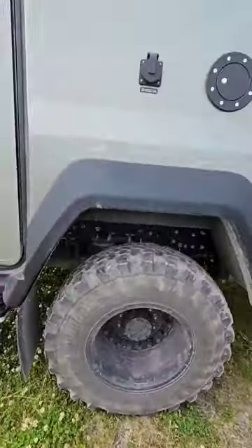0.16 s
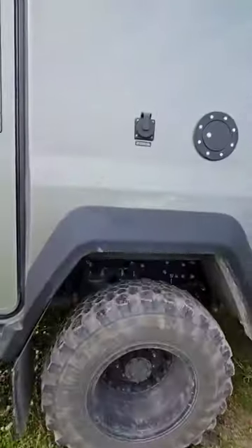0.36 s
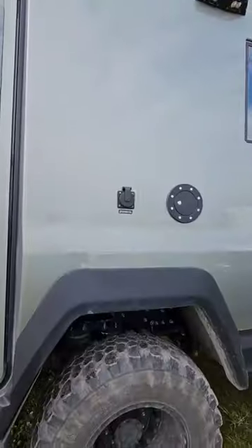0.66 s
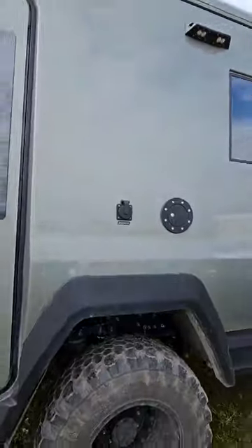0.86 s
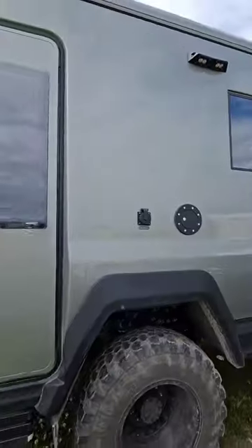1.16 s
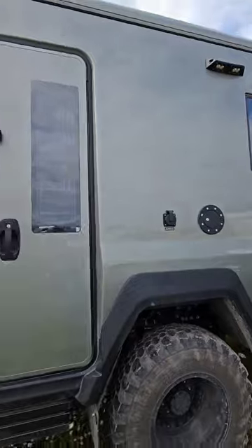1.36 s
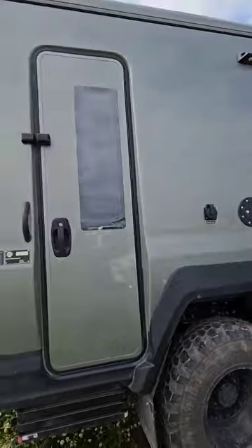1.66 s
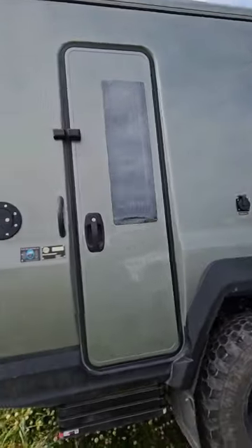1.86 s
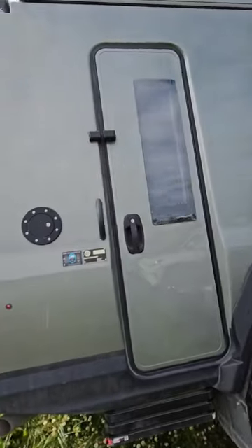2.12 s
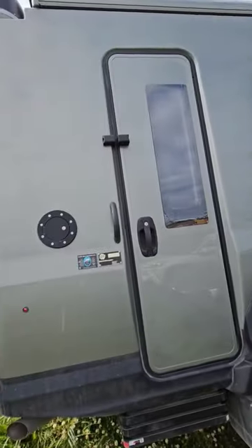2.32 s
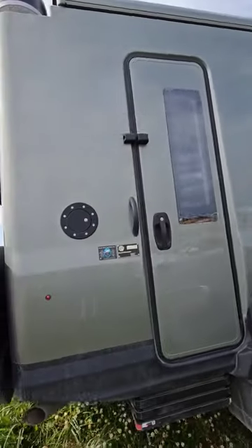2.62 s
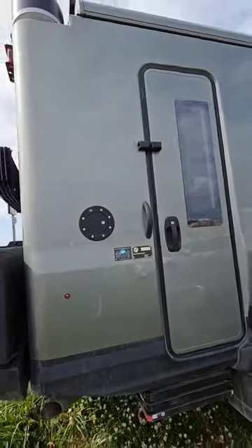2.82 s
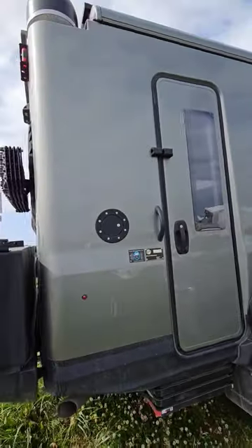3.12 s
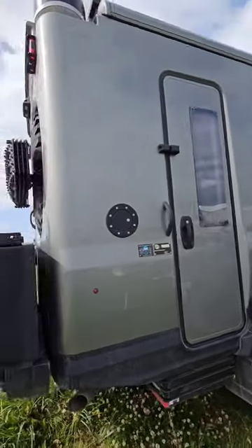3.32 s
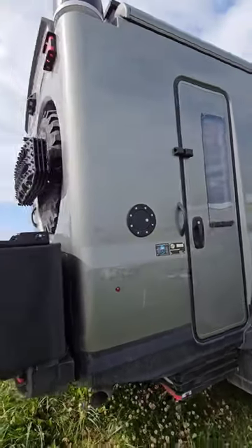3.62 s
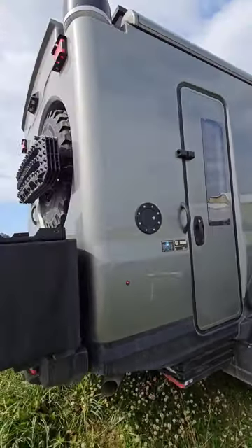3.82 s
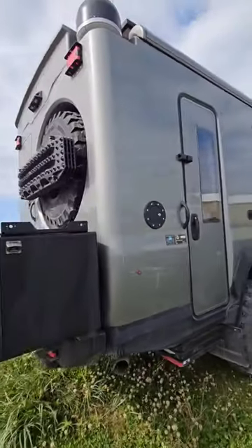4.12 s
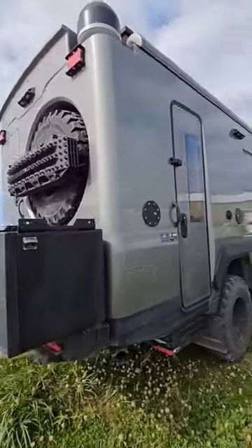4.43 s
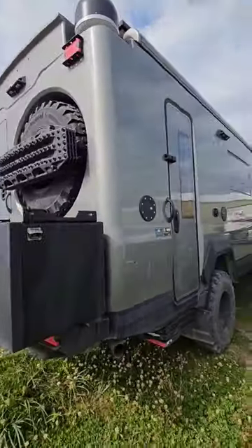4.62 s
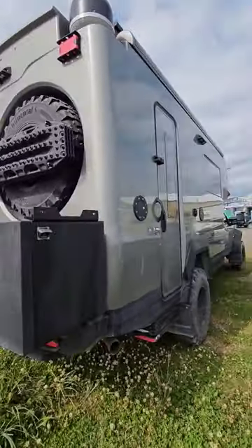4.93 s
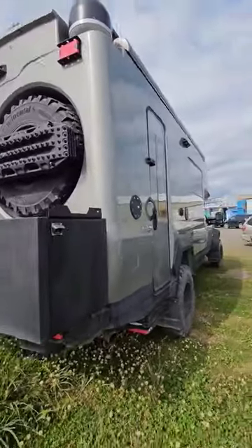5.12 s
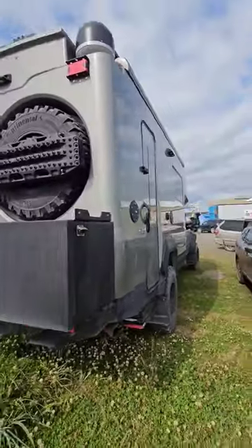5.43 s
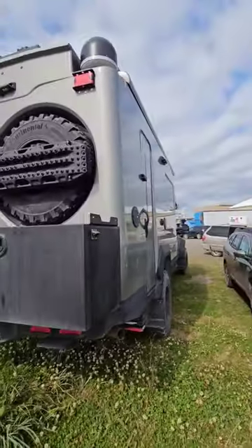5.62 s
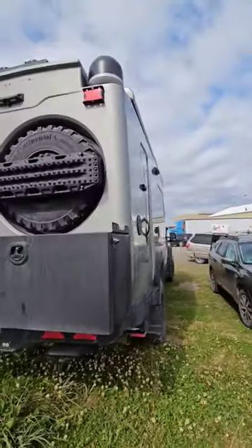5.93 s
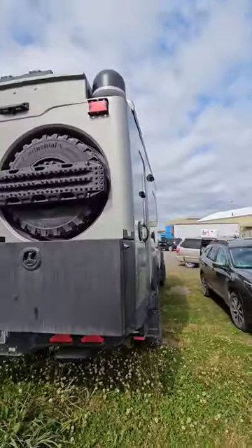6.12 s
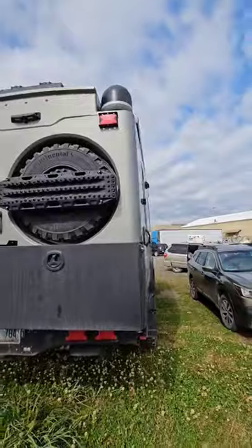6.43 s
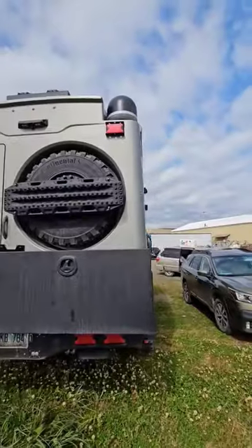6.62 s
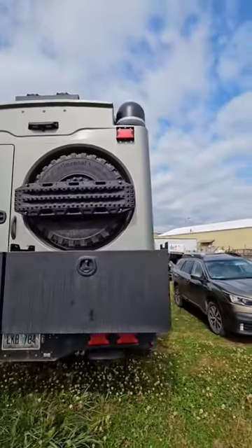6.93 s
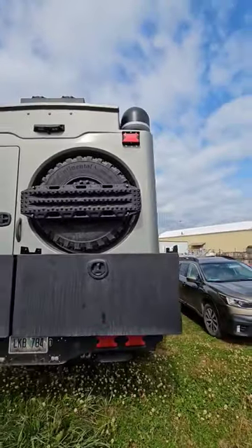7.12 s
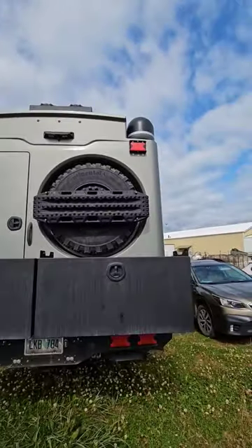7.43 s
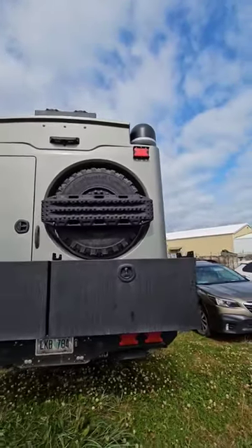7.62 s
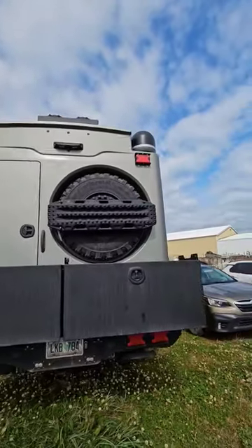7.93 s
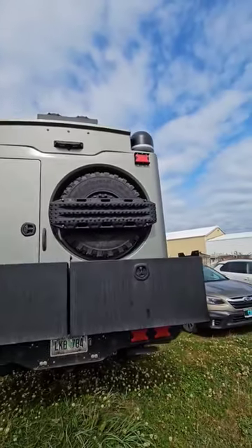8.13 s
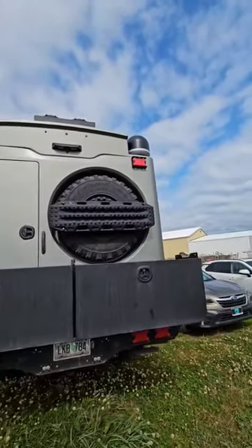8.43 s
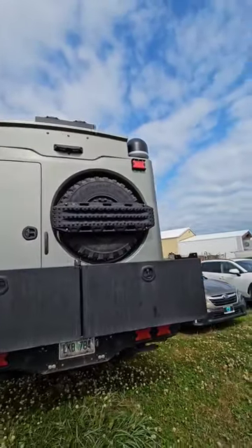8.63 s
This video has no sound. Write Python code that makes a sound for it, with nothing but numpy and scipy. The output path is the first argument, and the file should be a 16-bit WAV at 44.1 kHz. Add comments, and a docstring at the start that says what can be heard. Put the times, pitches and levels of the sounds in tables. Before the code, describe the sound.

From 0 s a heavy six-cylinder diesel idles steadily outdoors, a deep exhaust drone near 70 Hz wobbling and throbbing about six times a second. Soft gas puffs, low turbulent rumble, muffled panel knocks and broad rough engine and yard noise surround it. Shoes brush grass quietly, with a tiny snap at 0.3 s, a small cluster at 1.3-1.5 s and others near 2.8 and 3.9 s. Exhaust puffs grow stronger at about 4 s and stay full until 6.3 s; the bright clattery noise swells around 4.6 and 6 s. From 5.7 s dry stalks crackle, mostly right, with clear bursts and dull heel thuds at 6.2, 6.9 and 7.4 s. After 7 s the drone weakens, spreads wider and stumbles more. Further crackles come at 8.1 and 8.6 s, the latter with scuffing thuds, while the engine idles on to the 8.8 s end. The close stereo microphone travels with the walker.

```python
"""A low exhaust drone wobbles from the start: a six-cylinder diesel idling on grass, heard on a walk to its rear.
The drone is the second firing harmonic of an unevenly turning crank, joined by lesser orders of the cycle.
Each cylinder puffs into a resonant pipe, panels knock, the tail pipe rings and the exhaust flow rumbles.
Feet brush the grass as shaped noise, stalks snap as splintered rings and heels thud on the turf.
Broad engine and yard noise lies behind it all."""
import sys
import numpy as np
from scipy import signal
from scipy.fft import rfft, irfft, next_fast_len
from scipy.io import wavfile

SR = 44100
rng = np.random.default_rng(int(sys.argv[2]) if len(sys.argv) > 2 else 0)


def int16_out(signal):
    """Quantize to a 16-bit WAV file."""
    q = np.round(np.clip(np.atleast_2d(signal).T, -1, 1) * 32767)
    wavfile.write(sys.argv[1], SR, q.astype(np.int16))


def voltage_ratio(level):
    """Linear amplitude factor for a level in decibels (scalar or array-like)."""
    return 10 ** (np.asarray(level, float) / 20)


N = 386360

# a foot swings through the grass: (t/s of the loudest moment, level/dB, length/s)
SWISHES = [(0.278, -47.5, 0.023), (1.235, -60.5, 0.055), (1.39, -53, 0.11), (1.95, -55.5, 0.16),
           (2.326, -54.5, 0.061), (2.677, -55.5, 0.052), (2.812, -48.5, 0.043), (2.914, -52.5, 0.046),
           (3.093, -47.5, 0.073), (3.377, -55.5, 0.09), (4.018, -57.5, 0.17), (4.493, -47, 0.11),
           (4.807, -65, 0.031), (4.895, -64.5, 0.018), (5.272, -61, 0.17), (5.729, -57, .06),
           (6.243, -57, 0.026), (6.887, -50, 0.059), (7.411, -51, 0.057), (7.606, -59.5, 0.058),
           (8.048, -50.5, .06), (8.21, -58.5, 0.018), (8.64, -51.5, 0.037), (8.718, -63, 0.027)]


def rms_one(x):
    """Scale to unit rms."""
    return x / np.sqrt(np.mean(x ** 2) + 1e-20)


def in_time(rows):
    """Columns of a table as curves, one value a sample."""
    s, *columns = np.transpose(rows)
    return [np.interp(np.arange(N) / SR, s, c) for c in columns]


def at_hz(points, hz):
    """Read a spectrum on a log-frequency axis."""
    points = np.array(points)
    return np.interp(np.log(hz), np.log(points[:, 0]), points[:, 1])


def drift(rate_hz):
    """Slow chance of spread 1: noise through two equal poles at rate_hz, computed at every 40th sample."""
    r = np.exp(-80 * np.pi * rate_hz / SR)
    white = rng.standard_normal(N // 40 + 2002)
    slow = signal.lfilter([1], [1, -2 * r, r * r], white)[2000:]   # settled part only
    return np.interp(np.arange(N) / 40, np.arange(len(slow)), rms_one(slow))


def resonances(x, modes):
    """Parallel resonances (f/Hz, width/Hz, level/dB) with alternating signs."""
    out = 0
    for k, (hz, width_hz, db) in enumerate(modes):
        r = np.exp(-np.pi * width_hz / SR)
        top = [(1 - r * r) / 2, 0, (r * r - 1) / 2]
        bottom = [1, -2 * r * np.cos(2 * np.pi * hz / SR), r * r]
        out = out + (-1) ** k * voltage_ratio(db) * signal.lfilter(top, bottom, x + 1e-18)
    return out


def band(x, low_hz, high_hz):
    """Second-order band-pass."""
    edges = [low_hz, min(high_hz, .45 * SR)]
    return signal.sosfilt(signal.butter(2, edges, "band", fs=SR, output="sos"), x)


def sides(db):
    """Left and right gains for a level difference, left minus right."""
    return voltage_ratio(np.multiply.outer([.5, -.5], db))


def banded_noise(colour, patchy_db):
    """Third-octave bands of stereo noise, each with its own level, flicker, likeness and lean; rms 1."""
    # left-right likeness, clipped to 0..1 in use: (f/Hz, likeness)
    likeness = [(60, 0.87), (130, 1), (290, 0.84), (640, 0.73), (1410, 0.62), (3100, 0.059), (6820, -0.76),
                (15000, 0.91)]
    # lean to one microphone: (f/Hz, left minus right/dB)
    lean = [(60, -2), (110, 0), (200, 2), (380, -2.5), (700, 1.5), (1290, -6), (2380, -2), (4400, 2),
            (8120, 1.5), (15000, -10)]
    low_hz, high_hz = colour[0][0], colour[-1][0]
    edges = np.geomspace(low_hz, high_hz, round(3 * np.log2(high_hz / low_hz)) + 1)
    out, white = 0, rng.standard_normal((2, 2, N))
    for k, (low, high) in enumerate(zip(edges, edges[1:])):
        mid, side = band(white[k % 2], low, high)   # neighbouring bands use different noise
        hz = np.sqrt(low * high)
        alike = np.clip(at_hz(likeness, hz), 0, 1)
        pair = np.sqrt(1 + alike) * mid + np.sqrt(1 - alike) * side * [[1], [-1]]
        gain = voltage_ratio(at_hz(colour, hz) + patchy_db * drift(6.6))
        out = out + gain * sides([at_hz(lean, hz)]) * pair
    return rms_one(out)


def pulses(cycle, place, db, scatter_db):
    """One soft push each time the cycle passes a place, a little stronger or weaker each time."""
    passed = np.diff(np.floor(cycle - place), prepend=np.floor(cycle[0] - place)) > 0
    r = np.exp(-2 * np.pi * 250 / SR)   # gas takes half a ms to rush out
    pushes = passed * voltage_ratio(db + scatter_db * rng.standard_normal(N))
    return signal.lfilter([1], [1, -2 * r, r * r], pushes)


def engine():
    """The crank cycle drives orders, puffs, knocks and ringing; the truck's flank throws them back."""
    # engine speed: (t/s, speed/rpm)
    speed = [(0.0, 714.5), (0.2, 717.9), (1.0, 717.2), (1.6, 738.2), (2.4, 709.5), (2.8, 717.1),
             (3.6, 703.9), (3.8, 754.7), (5.2, 713.7), (6.0, 733.9), (6.4, 716.6), (7.2, 732.4),
             (7.6, 705.1), (8.2, 726.9), (8.76, 719.6)]
    # exhaust reaching the listener past the tail pipe and behind the body:
    # (t/s, drone level/dB, its octave level/dB, high order level/dB, puffs level/dB)
    exhaust = [(0, -14.5, -41, -33, -36.5), (.9, -14, -35.5, -36.5, -37), (1.85, -14, -40, -52.5, -37),
               (2.6, -15.5, -39, -47, -31.5), (3.6, -15, -36, -32, -30.5), (4.05, -18, -48.5, -49.5, -24),
               (4.6, -14, -35.5, -34, -27), (5.5, -14, -33.5, -29, -27.5), (6.3, -14.5, -45.5, -34, -28),
               (6.95, -15.5, -31, -33.5, -34), (7.15, -19, -35.5, -35, -34.5), (7.38, -20, -47, -39, -31),
               (7.43, -22.5, -57, -47.5, -50), (7.8, -23.5, -66, -36, -42),
               (8.01, -22.5, -57, -44.5, -37.5), (8.08, -24, -49, -43.5, -42), (8.3, -25, -54, -45.5, -39),
               (8.45, -22, -52, -39, -37.5), (8.76, -27.5, -60, -44, -41)]
    # one cylinder fires weakly: (t/s, scale of the drone's dip/dB, tail pipe ring level/dB)
    weak_firing = [(0, 5, -38), (.8, 0.5, -42), (1.6, 0, -50), (2.3, 3.5, -50), (3.4, 3, -47),
                   (4.6, 0, -40), (6.3, 1, -41), (7, 2, -45), (7.45, 5, -48), (7.58, 6, -35), (7.8, 6, -36),
                   (8.1, 9, -42), (8.35, 4, -43), (8.6, 3, -39)]
    rpm, = in_time(speed)
    cycle = np.cumsum(rpm) / 120 / SR   # one cycle is two turns of the crank
    drone_db, octave_db, high_db, puff_db = in_time(exhaust)
    dip_db, ring_db = in_time(weak_firing)
    out = crank_orders(cycle, drone_db, octave_db, high_db, dip_db)
    out = out + voltage_ratio(puff_db) * cylinder_puffs(cycle)
    out = out + panel_knocks(cycle)
    out = out + voltage_ratio(ring_db) * tail_pipe_ring(cycle)
    rumble = exhaust_flow()
    sideways = flank_echo(out, rumble)
    lean_db = np.interp(np.arange(N) / SR, [0, 3.5, 6.8, 8.76], [.7, .5, 0.03, 0.5])
    return out * sides(lean_db) + sideways * [[1], [-1]] + rumble


def crank_orders(cycle, drone_db, octave_db, high_db, dip_db):
    """Harmonics of the two-turn cycle; the main ones wobble with the crank and throb once a cycle."""
    # main orders: (order, place of a crest, place of the loudest moment; shares of the cycle)
    main_orders = [(12, 0, .2), (24, .018, .52), (31, -.0043, .6)]
    # uneven turning of the crank: (swings per cycle, depth/degrees of the cycle, place/share of the cycle)
    crank_swings = [(1, .8, .195), (3, 1.3, -.09)]
    # share of the wobble that each main order carries: (share)
    wobble_shares = [1.0, .7, .45]
    # lesser orders that follow the drone: (order, place of a crest/share of the cycle, level against it/dB)
    with_drone = [(6, -.05, -38), (9, -.03, -32), (10, -.022, -33), (11, .028, -20), (13, .015, -27),
                  (14, -.012, -33), (15, .0133, -30), (17, -.0265, -34), (18, .0278, -30), (21, -.004, -28),
                  (25, .0196, -34)]
    # lesser orders that follow the high order: (order, place of a crest/share of the cycle, level against it/dB)
    with_high = [(34, -.0025, -9)]
    angle = cycle + .0004 * drift(6.0)   # no two firings burn alike
    wobble = sum(degrees / 360 * np.sin(2 * np.pi * n * (cycle - place)) for n, degrees, place in crank_swings)
    dipped_db = drone_db + dip_db * (.25 - stumble(cycle, 0.59, 0.076))
    levels, throbs_db = [dipped_db, octave_db, high_db], [.4, 3.0, 5.0]
    out = 0
    for (order, crest, loudest), db, throb_db, share in zip(main_orders, levels, throbs_db, wobble_shares):
        db = db + throb_db * np.cos(2 * np.pi * (cycle - loudest))
        db = db + (0.087 + 0.04 * dip_db) * drift(5.6)
        out = out + np.sqrt(2) * voltage_ratio(db) * np.cos(2 * np.pi * order * (angle + share * wobble - crest))
    for orders, lead_db in [(with_drone, drone_db), (with_high, high_db)]:
        for order, crest, db in orders:
            level = voltage_ratio(lead_db + db + 1.1 * drift(1.3))
            out = out + np.sqrt(2) * level * np.cos(2 * np.pi * order * (angle - crest))
    return out


def stumble(cycle, place, recovery):
    """A quick sag once a cycle that heals slowly, deeper in some cycles than in others."""
    since = (cycle - place) % 1 / recovery
    depth = rng.uniform(.6, 1.8, 80)[np.floor(cycle - place).astype(int) + 1]
    return depth * since * np.exp(1 - since)


def cylinder_puffs(cycle):
    """Each cylinder pushes gas into the exhaust pipe, whose resonances colour it; rms 1."""
    # the cylinders: (puff place/share of the cycle, level/dB)
    cylinders = [(.105, .5), (.277, -1.5), (.485, 7), (.54, 0), (.776, 1.5), (.907, -7)]
    # resonances of the pipe: (f/Hz, width/Hz, level/dB)
    pipe = [(86, 14, -15), (140, 60, -12), (160, 19, 0), (190, 14, -12)]
    puffs = sum(pulses(cycle, place, db, scatter_db=.8) for place, db in cylinders)
    return rms_one(resonances(puffs, pipe))


def panel_knocks(cycle):
    """Two panels ring when shaken: the low one by one knock a cycle, the high one by two."""
    # panel resonances: (f/Hz, width/Hz, level/dB, cancelled by the scaling to rms 1)
    panels = [(236.7, 36, 1), (328.2, 23, 0)]
    # knocks as heard along the flank: (t/s, low panel level/dB, high panel level/dB)
    knock_levels = [(0, -61, -52), (.9, -44.5, -47.5), (1.9, -47, -65), (2.6, -44, -54), (3.7, -42, -55),
                    (4.05, -49.5, -48), (5, -42, -55), (6.4, -43.5, -48), (7, -45, -57.5), (7.6, -64, -60),
                    (8.1, -48.5, -56), (8.76, -60, -62)]
    double = pulses(cycle, .704, -3, scatter_db=1.5) + pulses(cycle, .824, 0, scatter_db=1.5)
    single = pulses(cycle, .724, 0, scatter_db=1.0)
    out = 0
    for mode, db, blows in zip(panels, in_time(knock_levels), [single, double]):
        ring = resonances(resonances(blows, [mode]), [mode])   # twice through: swells and stays narrow
        out = out + voltage_ratio(db) * rms_one(ring)
    return out


def tail_pipe_ring(cycle):
    """Every second cylinder rings the tail pipe, the weak one most; rms 1."""
    tail_pipe, weak = [(202, 22, 0)], .61   # (f/Hz, width/Hz, level/dB), place in the cycle
    pushes = sum(pulses(cycle, weak + k / 3, db, scatter_db=1.5) for k, db in enumerate([0, -7, -8]))
    return rms_one(resonances(resonances(pushes, tail_pipe), tail_pipe))


def exhaust_flow():
    """Turbulent exhaust gas rumbles as low stereo noise with a flickering spectrum."""
    # flow, loudest near the tail pipe: (t/s, level/dB)
    flow_levels = [(0, -31), (1.1, -34), (1.8, -33.5), (3, -31.5), (4, -31), (5, -32), (6.3, -30),
                   (7.2, -33), (7.6, -38), (8.76, -36)]
    # spectrum of the flow: (f/Hz, level per Hz/dB)
    flow_colour = [(25, -30), (42, -14), (60, 0), (90, -8), (120, -11), (190, -16), (230, -17), (290, -23),
                   (450, -31), (600, -45.5)]
    return voltage_ratio(in_time(flow_levels)[0]) * banded_noise(flow_colour, patchy_db=3.0)


def flank_echo(tones, rumble):
    """The flank throws the exhaust back late; added with opposite signs left and right, it widens the sound."""
    # echo, wider once the listener is behind the truck: (t/s, drone gain/dB, gain of the throb above it/dB)
    flank = [(0, -22, -15.5), (2, -23, -18), (3.5, -26.5, -24), (5.8, -22.5, -25), (6.5, -20.5, -21.5),
             (7.5, -17, -9.5), (8.76, -16, -5)]
    low_db, high_db = in_time(flank)
    heard = tones + rumble.mean(axis=0)
    throb = band(band(heard, 105, 450), 105, 450)
    return voltage_ratio(low_db) * np.roll(tones, 150) + voltage_ratio(high_db) * np.roll(throb, 310)   # 3.4 and 7 ms late


def grass():
    """Blades brushing past the shoes: bright noise roughened by grains, over a faint steady hiss."""
    # spectrum of the blades: (f/Hz, level per Hz/dB)
    blade_colour = [(1470, -25.5), (2500, -5.5), (3400, -8.5), (4000, -6), (5750, -10.5), (7950, -10.5),
                    (10500, -5.5), (11500, -12.5), (14900, -14.5), (15800, -9)]
    ticks = (rng.random(N) < 150 / SR) * rng.exponential(1, N)   # about 150 a second
    grain = voltage_ratio(1.5 * drift(60.0)) * (1 + .6 * signal.lfilter([1], [1, -.975], ticks))
    blades = rms_one(grain * banded_noise(blade_colour, patchy_db=-1.5))
    hiss = voltage_ratio(-65) * band(rng.standard_normal((2, N)), 2500, 14000)   # -65 dB before the band-pass
    return swings() * blades + hiss


def swings():
    """Loudness of the grass: a continuous brush plus a rounded swell for every swing, summed as power."""
    # grass brushed all along, fading as the walker slows: (t/s, level/dB)
    brush = [(0, -54.5), (1.6, -53.5), (2.2, -60), (3.0, -56), (3.7, -60.5), (4.2, -56.5), (5.0, -60),
             (6.0, -62), (7.2, -70.5), (8.76, -97)]
    rise, fall = 0.38, 0.66   # shares of the length
    t, (brush_db,) = np.arange(N) / SR, in_time(brush)
    power = voltage_ratio(2 * brush_db)
    for s, db, length in SWISHES:
        width = length * np.where(t < s, rise, fall)
        power = power + voltage_ratio(2 * db) * np.exp(-((t - s) / width) ** 2)
    return np.sqrt(power)


def snaps():
    """Each stalk splinters in a few cracks that ring a woody resonance and scatter a short dry treble."""
    # stalks snapping underfoot: (t/s, level before trims/dB, ring f/Hz, tilt from woody ring to dry treble/dB,
    # left minus right/dB)
    stalks = [(0.2708, -42, 1800, 4, -1), (1.338, -38, 5000, -14.5, 0), (1.3497, -36, 4800, -14, 1),
              (1.3895, -36, 4800, -9.5, 1), (1.5205, -38, 5000, -4, 0), (2.7664, -42, 3000, -12, -8),
              (2.82, -41, 2000, -2, -18), (3.877, -40, 1900, -28, -16), (3.8995, -32, 1760, -31.5, -10),
              (5.7164, -31.5, 1800, 2.5, -7.5), (5.7296, -37.5, 1780, -4, -6),
              (6.222, -41.5, 1800, 20, -13), (6.231, -25.5, 1710, 3, -21.5), (6.8442, -31, 1790, 9, -6),
              (6.8634, -32, 1800, 8, -26), (6.8889, -26.5, 1800, 12, -10.5), (7.3901, -27, 1410, 10.5, -8),
              (7.394, -34.5, 1920, -4.5, -15.5), (7.3988, -22.5, 2000, 9, -18),
              (7.421, -50, 2100, 7, -10.5), (7.4446, -23, 1720, 9, -12.5), (7.619, -33, 1820, -11, -10),
              (8.0204, -42, 1800, 27, -11), (8.0425, -50, 1800, 11, -3), (8.063, -26, 1810, 12, -7),
              (8.0734, -37.5, 1800, -10.5, -23.5), (8.2144, -39, 1470, -21, -15),
              (8.3101, -31, 1950, -8, -7), (8.6234, -24.5, 2050, 7, -18), (8.6536, -36.5, 2400, 13, -25.5),
              (8.665, -41, 1900, 3, -13), (8.6869, -35, 2400, 18, -8), (8.7104, -38.5, 2400, 20, -16)]
    splinters, widest_s, mean_fall_db = 3, .003, 5   # cracks in a stalk, their widest spread and mean weakening
    out, t = np.zeros((2, N)), np.arange(SR // 20) / SR
    rows = stalks + twigs()
    noise = rng.standard_normal((len(rows), 3, len(t)))
    chance = rng.random((len(rows), 3, splinters))
    for (s, db, hz, treble_db, pan_db), white, (late, size, sign) in zip(rows, noise, chance):
        spread = widest_s * np.clip((treble_db + 15) / 20, 0, 1)   # dull knocks come as one, brittle stalks splinter
        places = ((late - late.min()) * spread * SR).astype(int)
        cracks = np.zeros(len(t))
        np.add.at(cracks, places, voltage_ratio(-2 * mean_fall_db * size) * np.sign(sign - .3))
        ring = np.sin(2 * np.pi * hz * t) * np.exp(-t * hz / 1.6)
        ring = np.convolve(cracks, ring[:400])[:len(t)] / np.sqrt(np.sum(cracks ** 2) + 1e-9)
        woody = ring + 0.25 * white[2] * np.exp(-t / 0.003)
        woody = band(woody, .55 * hz, max(4000, 1.3 * hz))
        woody = band(woody, .4 * hz, max(4500, 1.5 * hz))   # dull on top
        puff = np.convolve(abs(cracks), np.exp(-t[:900] / 0.003))[:len(t)] / np.sqrt(splinters)
        dry_treble = band((white[0] + 0.24 * white[1] * [[1], [-1]]) * puff, 6000, 16000)
        burst = voltage_ratio(-treble_db / 2 - 1.0) * woody + voltage_ratio(treble_db / 2 - 13.5) * dry_treble
        i = round(s * SR)
        out[:, i:i + len(t)] += (voltage_ratio(db - 3.0) * sides([pan_db]) * burst)[:, :N - i]
    return out


def twigs():
    """Two more snaps at chance moments of every swing through dry grass, as rows like those of the stalks."""
    dry_from_s = 5.5   # behind the truck the grass is dry and crackles
    over_swish_db, pan_db = 14, -15   # level above the swish and lean, before scatter
    rows = []
    for (s, db, length), pair in zip(SWISHES, rng.uniform(-0.49, 1, (len(SWISHES), 2, 5))):
        if s > dry_from_s:
            for a, b, c, d, e in pair:
                rows.append((s + length / 2 * a, db + over_swish_db + 3 * b, 2200 + 500 * e,
                             8 + 6 * c, pan_db + 4 * d))
    return rows


def thuds():
    """A heel presses the turf: a short dull push, then loose soil shifts."""
    # footfalls on soft ground: (t/s, push before filters and gain/dB)
    footfalls = [(6.233, -24), (6.89, -27.5), (7.391, -25), (7.443, -34), (8.532, -36), (8.559, -28.5),
                 (8.577, -33), (8.605, -21.5), (8.624, -26), (8.639, -39)]
    soil_db, soil_s = -20, 0.025   # soil against the push, decay time
    clicks = np.zeros(N)
    for s, db in footfalls:
        clicks[round(s * SR)] = voltage_ratio(db)
    soil = signal.lfilter([1], [1, -np.exp(-1 / (soil_s * SR))], clicks) * rng.standard_normal(N)
    push = band(band(clicks + voltage_ratio(soil_db) * soil, 35, 530), 30, 600)
    return 60 * resonances(push, [(100.3, 44, 8.0), (306, 250, -12.5)])


def yard_noise():
    """Broad engine and yard noise: a bright part that swells and fades, a dull part that half follows it."""
    # swells: (t/s, bright part level/dB)
    swells = [(0.0, -53.5), (1.24, -51), (1.44, -47.5), (1.71, -47.5), (2.1, -51.5), (2.9, -46.5),
              (3.27, -49), (4.64, -42.5), (5.1, -49.5), (5.39, -48), (5.66, -45), (6.1, -44.5),
              (6.49, -47.5), (7.34, -49.5), (8.15, -51), (8.76, -53)]
    # spectrum of the noise: (f/Hz, level per Hz/dB)
    noise_colour = [(240, -33), (400, -8), (520, -3), (637, -8), (936, -2.5), (1150, -7.5), (1350, -7),
                    (1900, -10), (2250, -7.5), (2600, -21), (3320, -13), (3990, -23.5), (4500, -24),
                    (5850, -63), (9900, -120)]
    # upper treble against the mids: (t/s, gain/dB)
    upper_treble = [(0, -2), (3.7, -10), (3.9, -6), (6.6, -6), (7.2, -9.5), (8.76, -5.5)]
    bright_db, = in_time(swells)
    dull_db = -51.5 + 0.46 * (bright_db - bright_db.mean())   # mean level, share of the swells it follows
    hiss = banded_noise(noise_colour, patchy_db=1.5)
    ticks = (rng.random(N) < 120 / SR) * rng.exponential(1, N)
    hiss = hiss * (1 + .22 * signal.lfilter([1], [1, -.99], ticks))   # valve-gear clatter roughens it
    hiss[0] = np.roll(hiss[0], 3)   # the engine bay lies to the right, so the left hears it later
    dull = band(hiss, 260, 860)
    bright = band(hiss, 864, 7900)
    upper = voltage_ratio(in_time(upper_treble)[0]) * band(band(bright, 2450, 3900), 2450, 3900)
    shield = signal.butter(6, 2050, fs=SR, output="sos")   # the body shields the upper treble
    bright = signal.sosfilt(shield, bright) + upper
    return voltage_ratio(dull_db) * rms_one(dull) + voltage_ratio(bright_db + 0.47 * drift(40.0)) * rms_one(bright)


def scene():
    """The idling engine, the walker's feet and the yard noise behind."""
    return engine() + grass() + snaps() + thuds() + yard_noise()


def roll_off(x):
    """The treble ends steeply here."""
    return signal.sosfilt(signal.butter(12, 16400, fs=SR, output="sos"), x)


def record(dry):
    """The treble dips near 10.6 kHz, lifts towards 15.6 kHz and is cut above; the sound starts softly."""
    # colour of the treble: (f/Hz, gain/dB)
    treble_colour = [(8000, 0), (10600, -5.5), (11200, -0.5), (12500, 0), (15600, 2.5), (15900, -37)]
    size = next_fast_len(N)
    hz = np.arange(size // 2 + 1) * SR / size + 1   # 1 Hz up, to keep the logarithm finite
    heard = irfft(rfft(dry, size) * voltage_ratio(at_hz(treble_colour, hz)), size)[:, :N]
    heard = heard * np.minimum(np.arange(N) / 150, 1)   # a soft start
    return roll_off(heard)


dry = scene()
out = record(dry)
int16_out(out)
```